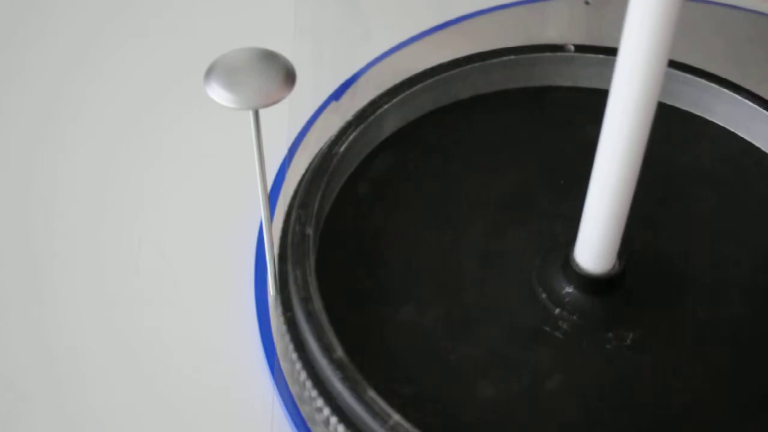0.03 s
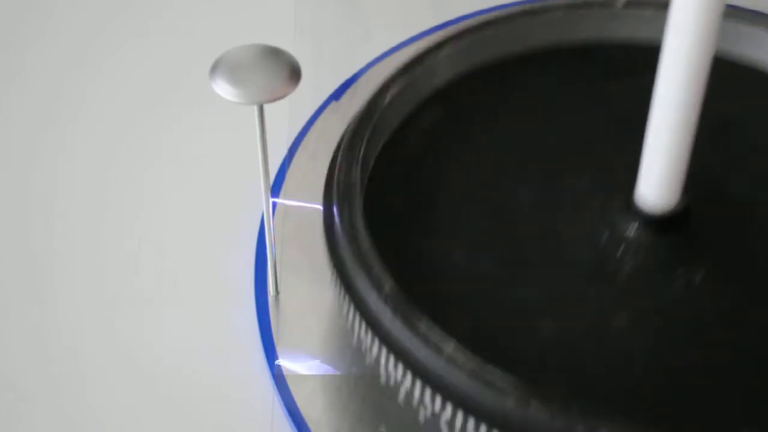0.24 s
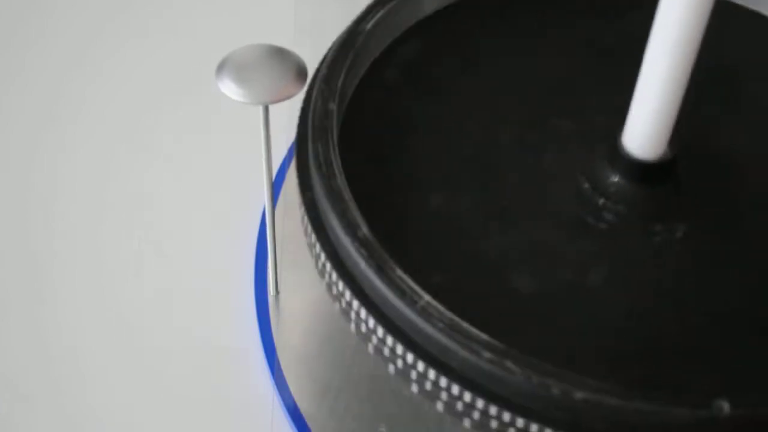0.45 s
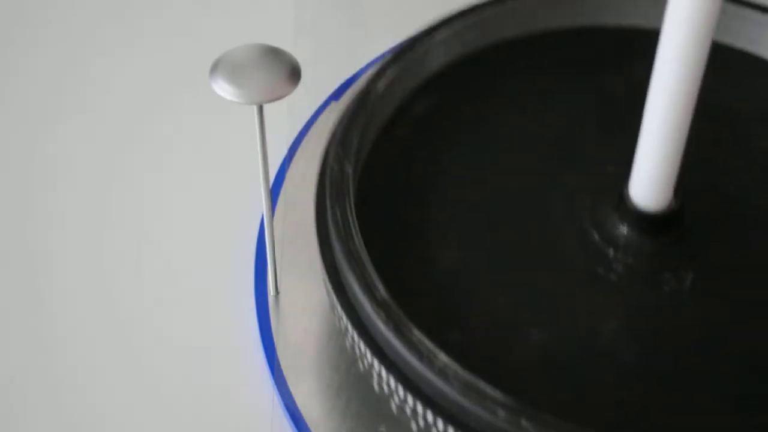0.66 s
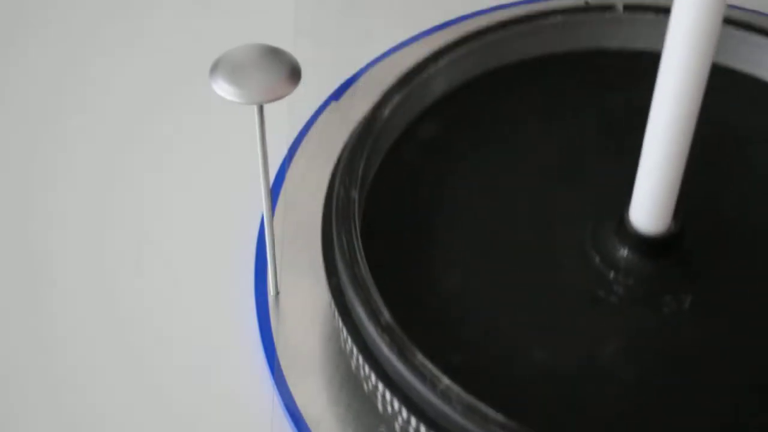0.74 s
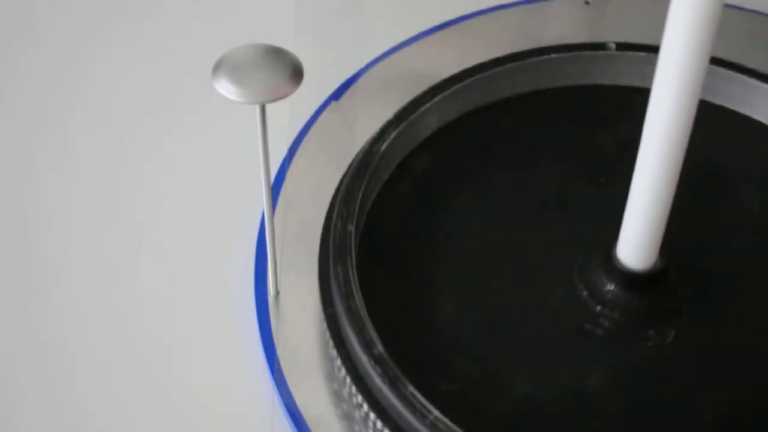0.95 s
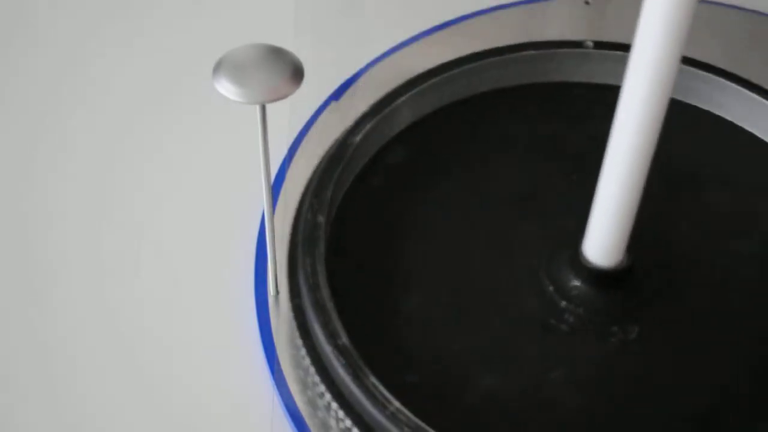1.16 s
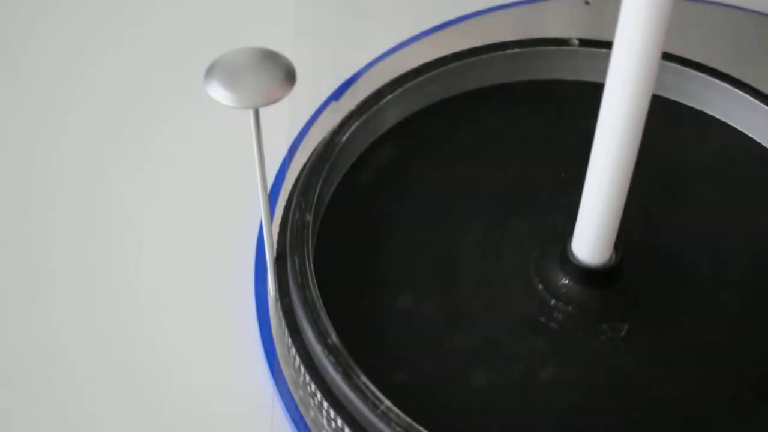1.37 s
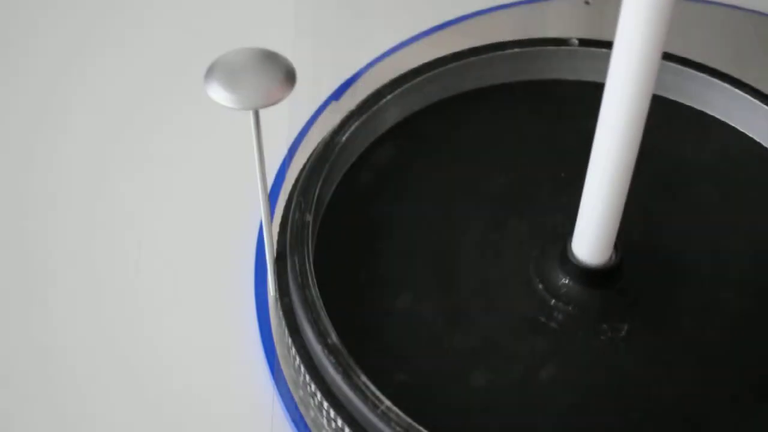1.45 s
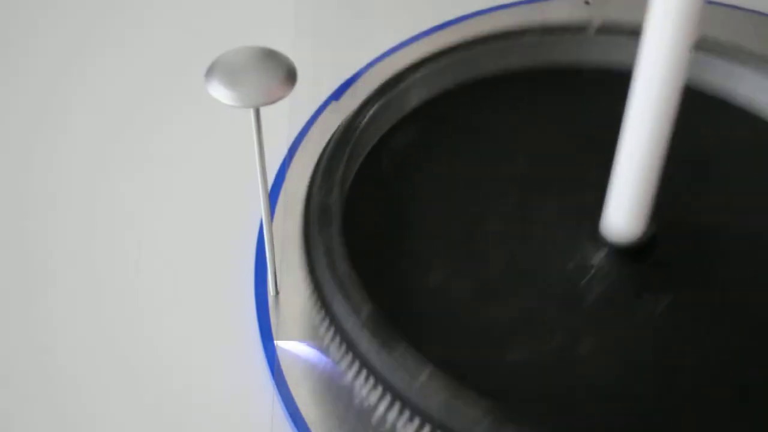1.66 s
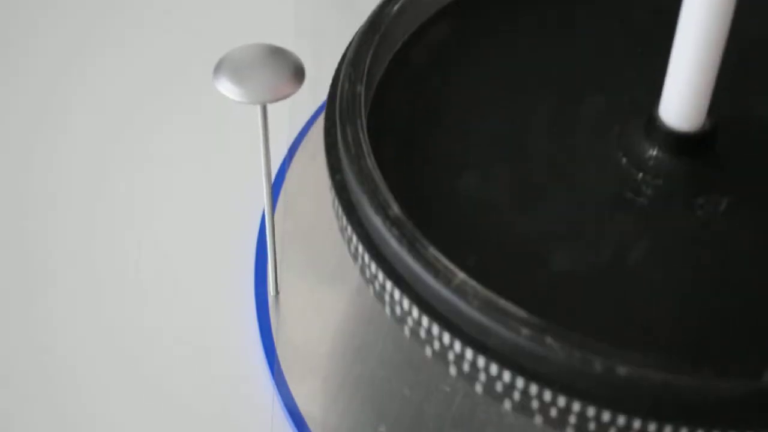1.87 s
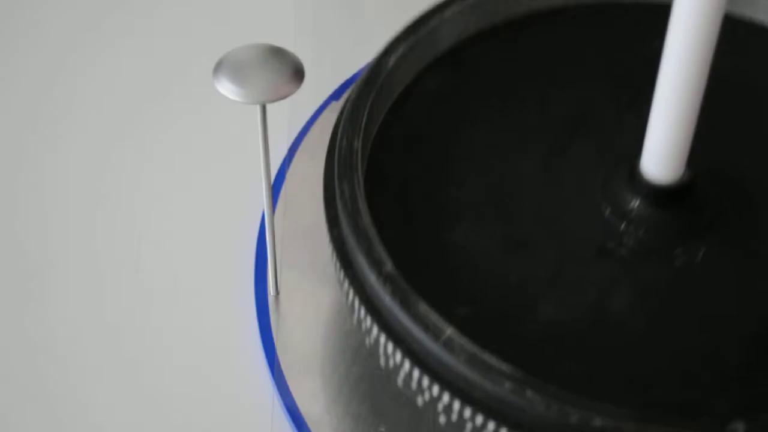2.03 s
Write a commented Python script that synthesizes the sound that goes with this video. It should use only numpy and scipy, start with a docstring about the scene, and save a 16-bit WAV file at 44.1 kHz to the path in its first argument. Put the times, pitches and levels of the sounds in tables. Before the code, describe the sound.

Two loud electric spark snaps with a hollow thud and faint metallic rattle between them.

```python
"""Two loud electric snaps in a quiet room, with a hollow thud and a faint metallic rattle between them.
Each snap is a spark, drawn as a charged metal plate is lifted beside a metal pin; room and metal ring on.
Between the sparks the plate is set down and rattles against the pin, which rings faintly.
The close, narrow-band microphone overloads on each snap."""
import sys
import numpy as np
from scipy import signal
from scipy.fft import rfft, irfft
from scipy.io import wavfile

SR = 44100
rng = np.random.default_rng(int(sys.argv[2]) if len(sys.argv) > 2 else 0)


def master(y):
    """Save y as 16-bit WAV."""
    cut = np.clip(np.atleast_2d(y).T, -1, 1)
    pcm = np.round(cut * 32767)  # scale
    wavfile.write(sys.argv[1], SR, pcm.astype(np.int16))


N = 92610

# tone colour of a dry contact: (frequency [Hz], relative level [dB])
CONTACT_COLOUR = [(200, -10.5), (700, 10), (1400, 9.5), (2500, 7), (4200, 5), (6000, 1.5)]


def sparks():
    """Each spark snaps with a pressure pulse, a crack and a shrill zing; room and metal ring on."""
    # (time [s], pulse gain [dB], pulse time scale [s], crack gain [dB], crack delay [s],
    #  zing level [dB], room gain [dB])
    snaps = [(0.2291, 6.5, 0.00033, 21, .00046, -20.5, -23), (1.671, -1.5, 0.00036, 10.5, .00046, -9, -23)]
    # colour of the crack: (frequency [Hz], relative level [dB])
    crack_colour = [(300, -5.5), (900, -2), (1400, 5), (2200, 1), (3200, 0), (5000, -8.5), (7000, -0.5)]
    # colour of the spark's reverb: (frequency [Hz], relative level [dB])
    reverb_colour = [(100, -48.5), (400, -13), (800, -6.5), (1400, -4), (2200, -0.5), (3200, 2.5),
                     (4300, 5.5), (5100, 6), (6200, -5.5)]
    # metal ringing after a spark: (frequency [Hz], level [dB], t60 [s])
    metal_modes = [(3294, -37.5, 0.49), (3256, -49.5, .6), (4190, -45.5, 0.32), (4040, -37.5, 0.28),
                   (4090, -40.5, 0.54), (4564, -39.5, 0.36), (4598, -36.5, 0.54), (4740, -45.5, 0.27)]
    zing_delay_s, predelay_s = .00085, .002
    out = np.zeros(N)
    reverb = room_tail(reverb_colour)
    ring = sum(mode(*row) for row in metal_modes)
    for s, pulse_db, scale_s, crack_db, crack_delay_s, zing_db, room_db in snaps:
        add(out, s, pressure_pulse(pulse_db, scale_s))
        add(out, s + crack_delay_s, amp(crack_db) * click(crack_colour))
        add(out, s + zing_delay_s, mode(hz=4150, db=zing_db, t60=.007))
        add(out, s + predelay_s, amp(room_db) * reverb + ring)
    return out


def plate_landing():
    """The plate touches with one edge, then drops flat with a push of air and a hollow thud."""
    # impacts on the base: (time [s], thud gain [dB], clack gain [dB])
    impacts = [(0.9092, -11, -6.5), (0.9103, -14.5, -25), (0.9114, 2, -13)]
    out, thud = np.zeros(N), plate_thud()
    for s, thud_db, clack_db in impacts:
        add(out, s, amp(thud_db) * thud)
        add(out, s, pressure_pulse(thud_db - 19.5, scale_s=.0003))  # air pressed out
        add(out, s, -amp(clack_db) * click(CONTACT_COLOUR))
    return out


def plate_thud():
    """The plate's modes and their boom in the room; its deepest bass does not radiate."""
    # the plate on its base: (frequency [Hz], relative level [dB], t60 [s])
    plate_modes = [(157.3, -30.5, 0.32), (292.4, -34, 0.38), (298, -19, 0.036), (360, -35, 0.46),
                   (416, -38, 0.29), (541, -31.5, 0.075), (717, -39.5, 0.26), (737, -36.5, 0.27),
                   (761, -38, 0.29), (891, -41, 0.27), (1107, -41, 0.29), (1374, -30, 0.032),
                   (1820, -41.5, 0.073), (2240, -37, 0.033), (2500, -49, 0.5), (3250, -42, 0.054),
                   (4150, -37, .03)]
    # colour of the thud's reverb: (frequency [Hz], relative level [dB])
    boom_colour = [(30, -45.5), (70, -7), (160, -2), (380, 0), (750, -8.5), (1200, -12), (2500, -17),
                   (5500, -24.5)]
    low_cut = signal.butter(2, 169, "high", fs=SR, output="sos")
    body = signal.sosfilt(low_cut, sum(mode(*row) for row in plate_modes))
    return amp(-33.5) * room_tail(boom_colour) - body


def pin_rattle():
    """Light contacts tick; those on the pin scuff it, ring its modes and knock the plate softly."""
    # light touches of the plate: (time [s], gain [dB])
    ticks = [(0.0412, -31), (1.2190, -20), (1.5620, -27)]
    # plate hitting the pin: (time [s], lower mode [dB], middle mode [dB], contact gain [dB])
    hits = [(1.2232, -32, -34, -25.5), (1.2632, -35.5, -42.5, -23), (1.2830, -41, -47, -55.5),
            (1.3076, -54, -41, -29.5), (1.3475, -41, -63, -30.5), (1.4313, -60, -90, -40)]
    # the pin's three modes: (frequency [Hz], t60 [s])
    pin_modes = [(3515, 0.1), (4942, 0.085), (6083, 0.11)]
    contact, pin, body = np.zeros((3, N))
    for s, db in ticks:
        add(contact, s, amp(db) * click(CONTACT_COLOUR))
    for s, lower_db, middle_db, contact_db in hits:
        add(contact, s, amp(contact_db) * scuff())
        add(body, s, amp(contact_db + 3) * plate_thud())
        top_db = middle_db - 7.5
        for (hz, t60), db in zip(pin_modes, (lower_db, middle_db, top_db)):
            add(pin, s, mode(hz, db, t60, rise_s=.00084))
    reverb_send = amp(-1.5) * contact + amp(-12) * pin
    return contact + pin + body + room_reverb(reverb_send)


def scuff(peak_s=.0021):
    """A soft puff of friction noise of unit energy."""
    u = np.arange(SR // 10) / SR / peak_s
    puff = noise(CONTACT_COLOUR, len(u)) * u * np.exp(-u)
    return puff / np.linalg.norm(puff)


def thin_ring():
    """A faint high note swells and fades after the plate is moved."""
    # note onsets: (time [s], level [dB])
    onsets = [(0.062, -57), (1.075, -56.5)]
    out = np.zeros(N)
    for s, db in onsets:
        add(out, s, mode(hz=2525, db=db, t60=.42, rise_s=.0068))
    return out


def room_tail(colour, build_s=.0014):
    """Diffuse reflections that build quickly and die band by band."""
    # the room's decay: (frequency [Hz], t60 [s])
    decay_times = [(100, 0.38), (500, 0.66), (1500, 0.64), (3000, 0.62), (5500, 0.56)]
    hz, t, bands = signal.stft(noise(colour, SR), SR, nperseg=256)
    decay = np.exp(-np.log(1000) * t / curve_at(decay_times, hz)[:, None])
    tail = signal.istft(bands * decay, SR, nperseg=256)[1][:SR]
    return tail * (1 - np.exp(-np.arange(SR) / SR / build_s))


def room_reverb(send):
    """The room's reflections of the small contact sounds."""
    response = room_tail(CONTACT_COLOUR)
    return signal.fftconvolve(send, response / np.linalg.norm(response))[:N]


def room_tone(hum_hz=187, hum_width_hz=42):
    """A soft, steady bed of noise with a wavering low hum."""
    # colour of the bed: (frequency [Hz], relative level [dB])
    air_colour = [(15, -56), (25, -11.5), (130, -6.5), (170, -8.5), (280, -1), (674, -6), (904, -12.5),
                  (1360, -15.5), (1900, -20), (2550, -21), (2730, -26), (4490, -24.5), (5500, -30.5),
                  (7150, -64.5), (12100, -120)]
    hz = np.fft.rfftfreq(N, 1 / SR)
    resonance = 1 / (1 + (2 * (hz - hum_hz) / hum_width_hz) ** 2)
    hum = irfft(rfft(rng.standard_normal(N)) * resonance, N)
    return amp(-55) * noise(air_colour, N) + amp(-58.5) * unit_rms(hum)


def pressure_pulse(db, scale_s):
    """A two-sided pressure pulse: a short swing one way, a longer one back."""
    u = np.arange(SR // 20) / SR / scale_s
    return amp(db) * (u - 3) * u ** 2 * np.exp(-u)


def mode(hz, db, t60, rise_s=1 / SR):
    """One ringing partial that dies by 60 dB in t60 seconds."""
    t = np.arange(SR) / SR
    envelope = np.exp(-np.log(1000) * t / t60) * (1 - np.exp(-t / rise_s))
    return amp(db) * envelope * np.sin(2 * np.pi * hz * t)


def click(colour, size=2048):
    """A sharp, minimum-phase impulse with the given colour."""
    hz = abs(np.fft.fftfreq(size, 1 / SR))
    log_gain = np.log(amp(curve_at(colour, hz)))
    spectrum = np.exp(np.conj(signal.hilbert(log_gain)))
    return np.fft.ifft(spectrum).real


def noise(colour, size):
    """Noise of rms 1 with the given colour."""
    gain = amp(curve_at(colour, np.fft.rfftfreq(size, 1 / SR)))
    return unit_rms(irfft(rfft(rng.standard_normal(size)) * gain, size))


def curve_at(points, hz):
    """Interpolates a table on a log-frequency axis."""
    f, value = np.transpose(points)
    return np.interp(np.log(hz + 1), np.log(f + 1), value)


def amp(db):
    """Decibels to gain."""
    return 10 ** (np.asarray(db) / 20)


def unit_rms(x):
    """Scales to rms 1."""
    return x / np.sqrt(np.mean(x ** 2) + 1e-20)


def add(mix, s, sound):
    """Mixes a sound in at s seconds."""
    part = mix[round(s * SR):][:len(sound)]
    part += sound[:len(part)]


def scene():
    """All sources at one microphone, the same in both channels."""
    mono = sparks() + plate_landing() + pin_rattle() + thin_ring() + room_tone()
    return np.tile(mono, (2, 1))


def record(dry):
    """The microphone loses the top treble and clips on the snaps; a low-pass trims the distortion."""
    rolloff_hz, stop_hz, edge_hz = 5450, 6200, 16100
    clip_level, knee = .73, 7.6
    hz = np.fft.rfftfreq(2 * N, 1 / SR)
    rolloff = 1 / np.sqrt(1 + (hz / rolloff_hz) ** 41)
    brick_wall = 1 / np.sqrt(1 + (hz / stop_hz) ** 120)
    dull = irfft(rfft(dry, 2 * N) * rolloff * brick_wall)[:, :N]
    clipped = dull / (0.5 + abs(dull / clip_level) ** knee) ** (1 / knee)
    low_pass = signal.firwin(255, edge_hz, window=("kaiser", 9), fs=SR)
    return signal.oaconvolve(clipped, low_pass[None], "same")


dry = scene()
out = record(dry)
master(out)
```